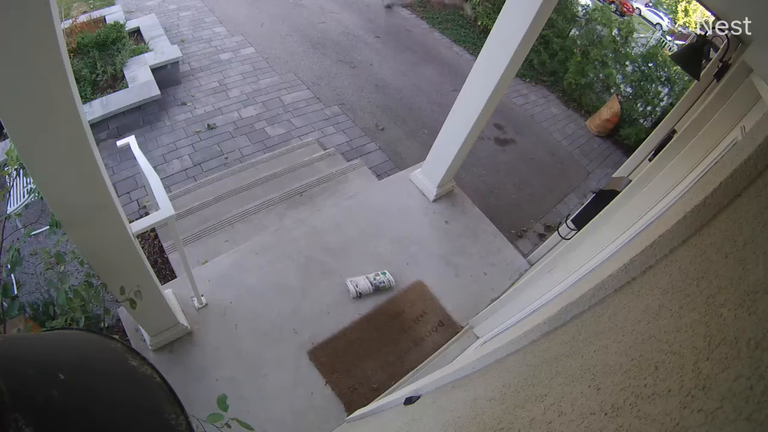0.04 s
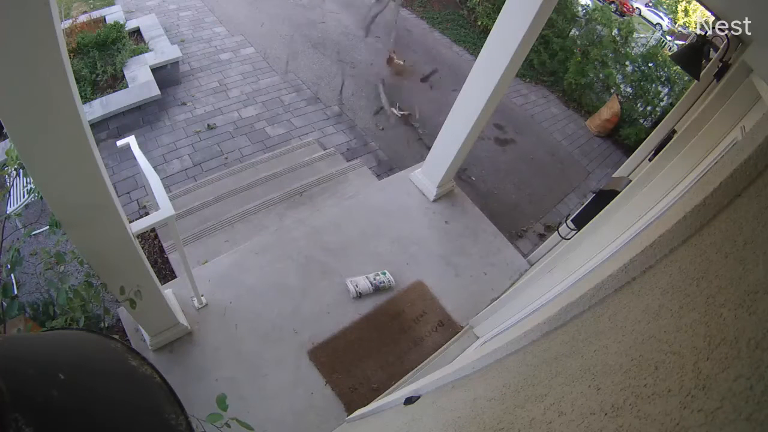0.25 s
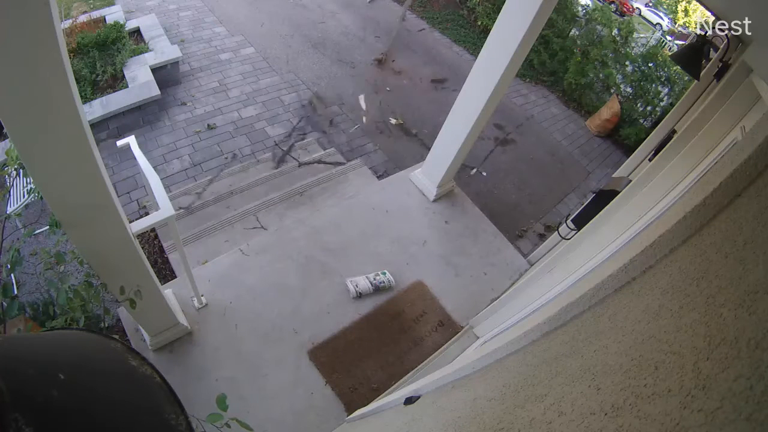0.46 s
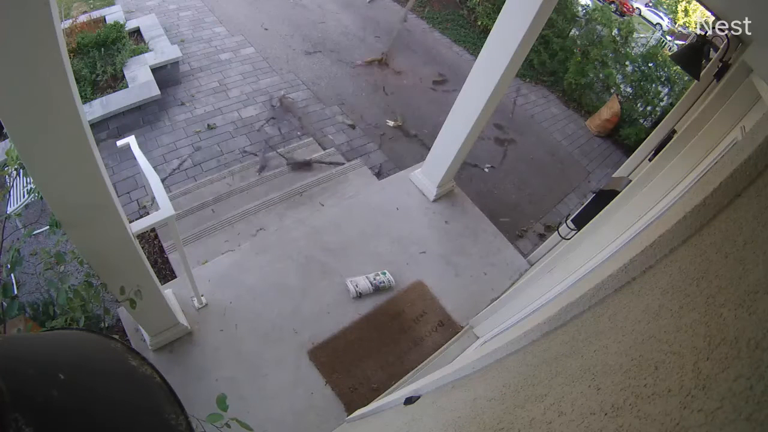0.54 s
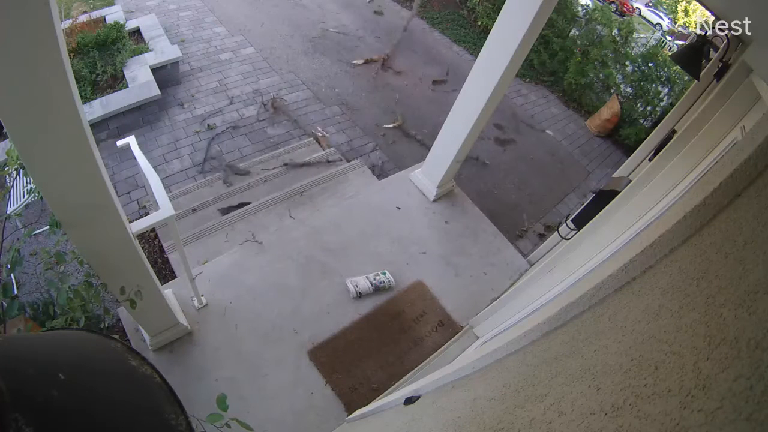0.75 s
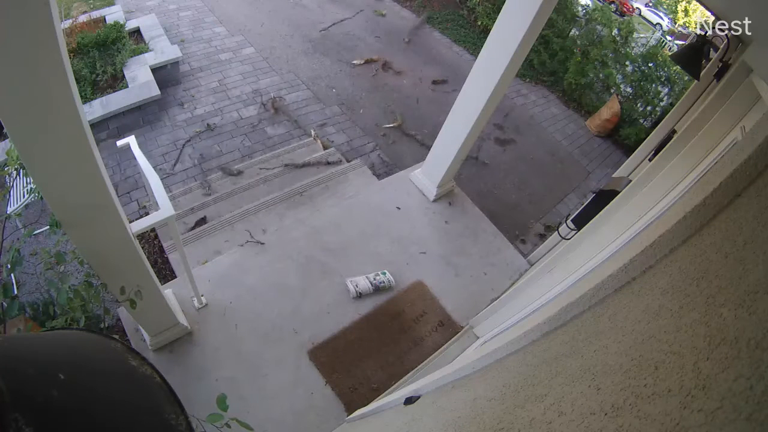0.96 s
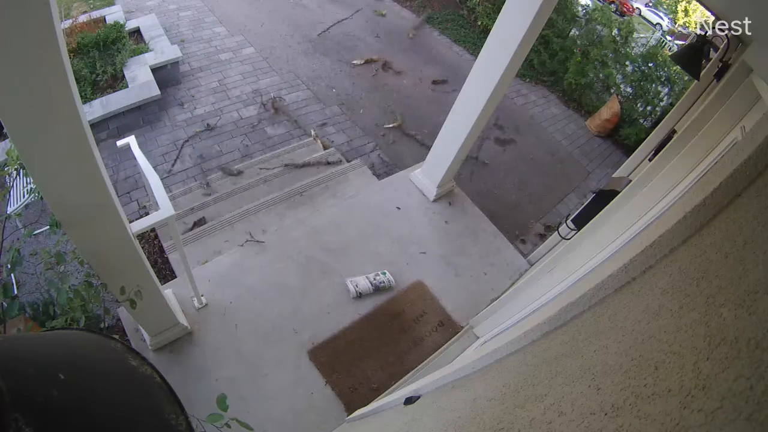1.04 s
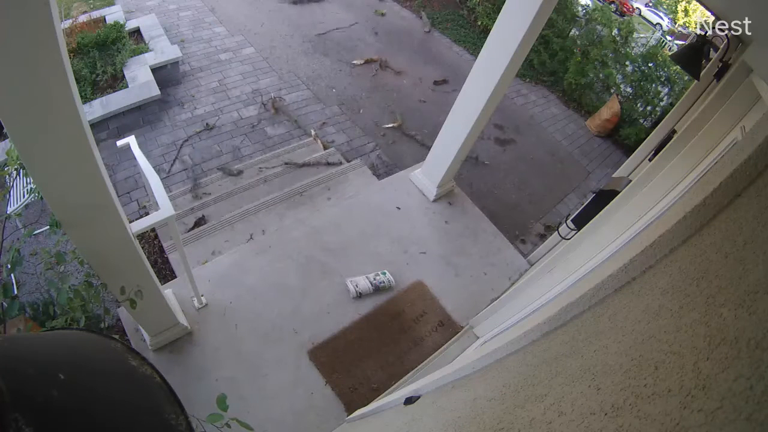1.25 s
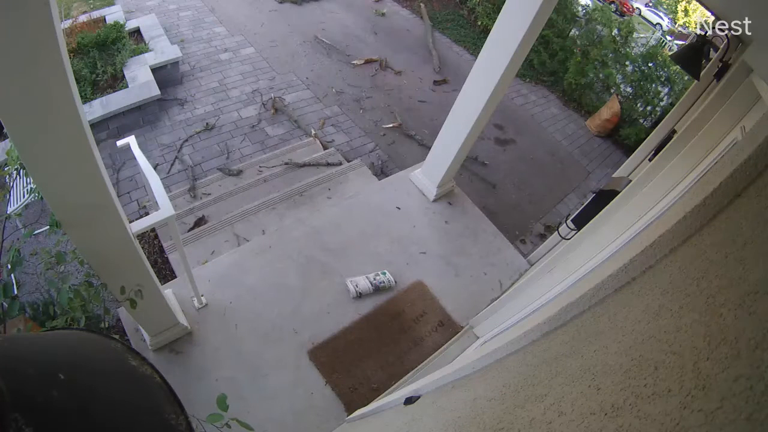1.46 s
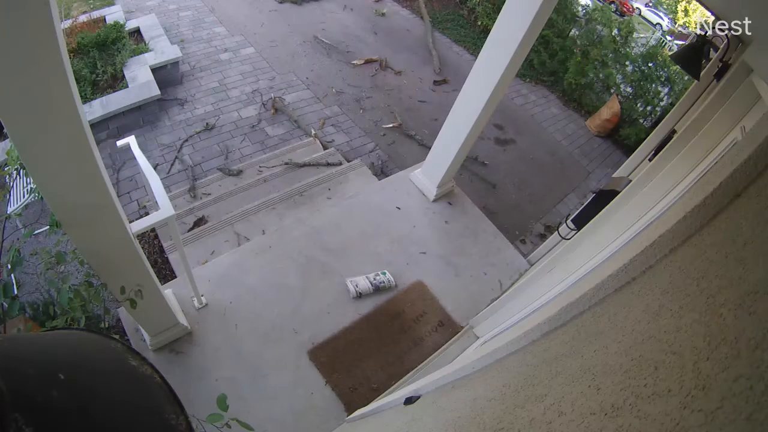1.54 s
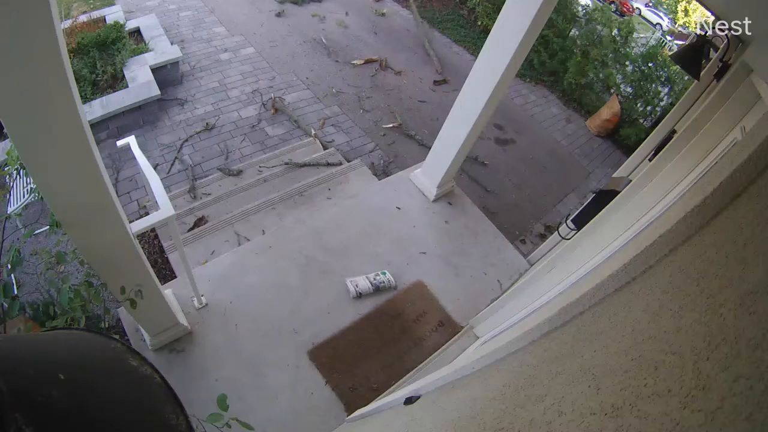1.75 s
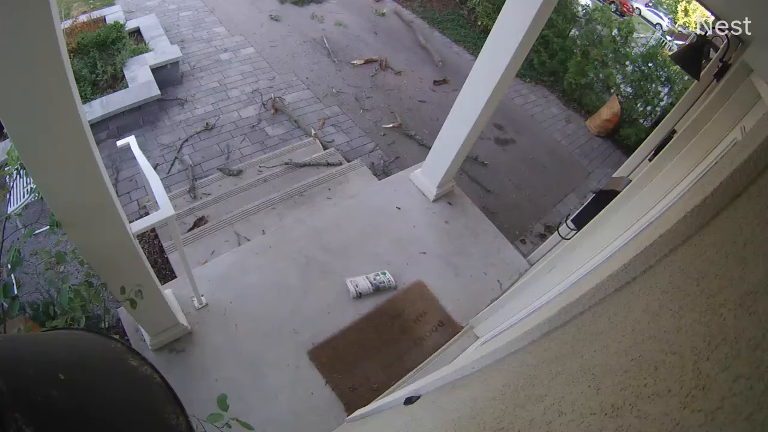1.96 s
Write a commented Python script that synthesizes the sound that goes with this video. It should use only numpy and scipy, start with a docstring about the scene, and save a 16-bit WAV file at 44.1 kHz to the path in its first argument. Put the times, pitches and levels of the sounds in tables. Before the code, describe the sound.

A dry tree branch crashes onto a paved driveway. Faint leaf rustle until 0.2 s, then snaps and a loud burst at 0.24, with hollow knocks, ground thumps and a very sharp crack at 0.41. Twigs and sticks clatter, with a ringing woody knock near 0.7 and another hard crack at 0.92. Lighter bounces at 1.2 to 1.7 thin into faint rustle; short porch echo, small dull microphone.

```python
"""Wood snaps and sharp twig hits as a dry branch crashes onto a paved driveway: resonated noise and clicks.
Heavy limbs land with resonated contacts and ground thumps, while damped sines ring on.
Showers of twigs and sticks are random contacts convolved with ringing modes; struck wood pings as sines.
Leaves rustle as fluttering filtered noise. A porch adds a short echo of sparse decaying reflections,
and a small microphone narrows the band."""
import sys
import numpy as np
from scipy import signal
from scipy.io import wavfile
from scipy.ndimage import uniform_filter1d

SR = 44100
rng = np.random.default_rng(int(sys.argv[2]) if len(sys.argv) > 2 else 0)


def dump(signal):
    """Clip the signal to [-1, 1] and save it as 16-bit WAV at the path in sys.argv[1]."""
    limited = np.clip(np.atleast_2d(signal).T, -1, 1)
    pcm = np.round(limited * 32767).astype(np.int16)
    wavfile.write(sys.argv[1], SR, pcm)


N = 88200  # samples: two seconds

# Spectrum of the foliage rustle, relative: f/Hz, level/dB
LEAF_SPECTRUM = [(30, -16.5), (250, -8.5), (600, -7.5), (1300, -11), (2200, 0), (3500, -1), (4500, 12),
                 (5500, -0.5), (7400, -8.5)]
# Reverberation time of the porch: f/Hz, t60/s
PORCH_DECAY = [(100, 0.5), (600, 0.23), (2500, 0.38), (7000, 0.17)]
# Sprays of small wood: peak t/s, rise/s, decay constant/s, twig level/dB, stick level/dB, emphasised twig f/Hz
SPRAYS = [(.01, 0.08, 0.079, -39, -50.5, 3830), (0.238, 0.013, 0.0059, -17.5, -24.5, 3070),
          (.284, 0.069, 0.039, -26, -32.5, 4460), (0.316, 0.019, 0.0039, -22.5, -28.5, 4500),
          (.385, 0.0061, 0.033, -30, -39, 3550), (0.415, 0.0053, 0.2, -42.5, -37.5, 4370),
          (0.483, 0.013, 0.045, -30.5, -36, 3560), (.512, 0.045, 0.16, -28.5, -33.5, 3670),
          (0.574, 0.011, 0.024, -30, -35.5, 2990), (.665, 0.1, 0.055, -29, -41.5, 2800),
          (0.704, 0.041, 0.032, -25, -28, 4750), (0.801, 0.059, 0.26, -39, -42, 4470),
          (.923, 0.0042, 0.006, -36.5, -22.5, 2700), (0.954, .0095, 0.072, -40.5, -50.5, 2600),
          (1.059, 0.031, 0.14, -38.5, -47, 4300), (1.164, 0.053, 0.15, -32.5, -47, 3790),
          (1.226, 0.036, 0.059, -27, -36, 3000), (1.313, .005, 0.011, -28, -55, 4930),
          (1.377, 0.056, 0.05, -35.5, -40.5, 4360), (1.46, 0.0048, 0.051, -34, -35.5, 3950),
          (1.512, 0.0073, 0.034, -37.5, -51, 4200), (1.578, 0.0042, 0.077, -30.5, -40, 3700),
          (1.66, .004, 0.01, -29, -47, 4350), (1.714, 0.053, 0.016, -29.5, -44, 3520)]
# Spectra impressed on the clatter of twigs and of sticks, relative: f/Hz, level/dB
TWIG_SPECTRUM = [(200, -54.5), (900, -28), (1800, -5.5), (2800, -1), (3700, -3), (4700, 1), (5400, -2.5),
                 (7400, -1.5)]
STICK_SPECTRUM = [(150, -66), (600, -7.5), (950, -1.5), (1400, 6), (2000, 7.5), (2800, -2), (5000, -47)]
# Single ringing notes of struck wood, from sticks and the limb: onset t/s, level/dB, f/Hz
WOOD_PINGS = [(.24, -30, 1369), (.585, -30.5, 2880), (.69, -30.5, 940), (.835, -37.5, 298.4),
              (1.21, -43, 2882), (1.305, -28.5, 4930), (1.466, -35, 1570), (1.697, -39.5, 3306)]
# Modes of the main limb: f/Hz, level/dB, t60/s
LIMB_MODES = [(303, -14, .35), (364, -15, .4), (455, -12, .18), (516, -12, .25), (548, 0, .24),
              (633, -13, .3), (764, -17, .3), (941, -14, .22)]
# Limbs landing: peak t/s, rise/s, decay constant/s, knock level/dB, knock f/Hz, thump level/dB, ringing level/dB
LANDINGS = [(0.241, 0.018, 0.013, -27, 692, -42, -42.5), (0.314, 0.0083, 0.0088, -28, 723, -48.5, -46),
            (0.383, 0.0028, 0.019, -26, 490, -43, -72), (.411, 0.0077, 0.026, -28.5, 730, -47.5, -44),
            (0.529, .06, 0.03, -40, 400, -48.5, -52.5), (.581, 0.032, 0.046, -35, 602, -50.5, -40),
            (.656, 0.018, 0.096, -36, 650, -54.5, -41.5), (.711, .02, .026, -28.5, 440, -47, -26),
            (.775, .015, .02, -42, 370, -57, -35), (.854, 0.035, 0.057, -39.5, 352, -51, -68),
            (0.918, 0.023, 0.0023, -33, 707, -48.5, -73.5), (1.05, 0.11, 0.48, -53, 500, -62, -71.5),
            (1.164, 0.029, 0.0084, -43, 400, -84.5, -49.5), (1.228, .018, 0.07, -33, 640, -56, -38),
            (1.274, .02, 0.019, -34, 432, -48.5, -54), (1.464, 0.0098, 0.017, -38, 520, -56, -58),
            (1.598, 0.038, 0.23, -50, 584, -62, -49), (1.733, 0.0086, 0.0086, -41, 558, -53.5, -78),
            (1.843, 0.016, 0.028, -51.5, 375, -73, -77)]
# Spectrum of the thump in the ground, relative: f/Hz, level/dB
THUMP_SPECTRUM = [(15, -20), (42, -1), (75, -5.5), (110, -2), (190, -1), (400, -9), (1500, -71)]
# Wood snapping, and single sharp twig hits: t/s, level/dB, f/Hz, decay constant of the crackle/s
SNAPS_AND_HITS = [(.1955, -30.5, 4210, 0.0037), (.2372, -26, 2720, 0.002), (.2387, -21, 1333, 0.0034),
                  (.309, -32.5, 4520, 0.0014), (.3148, -36.5, 4000, .0018), (.4113, -13.5, 3370, 0.00091),
                  (.4861, -20.5, 3610, .006), (.5095, -30.5, 3410, .003), (.5765, -28.5, 2920, 0.0023),
                  (.709, -23.5, 3000, 0.0016), (.9022, -20.5, 2300, .0028), (.905, -21.5, 3700, .003),
                  (.9182, -26, 3090, .001), (.9217, -13, 3100, .0012), (1.173, -28, 3200, .002),
                  (1.367, -29.5, 4400, 0.0017), (1.3795, -30.5, 2540, 0.0021), (1.4609, -37, 3300, .004),
                  (1.578, -31, 3780, .003), (1.6863, -28.5, 3670, 0.00097), (1.7185, -41, 3900, 0.0013),
                  (1.891, -48, 4600, .0035)]
# Response of the microphone ahead of its low-pass: f/Hz, gain/dB
MICROPHONE_RESPONSE = [(20, 1.5), (5000, 1.5), (5700, -4.5), (6300, -3.5), (7300, -19)]

LEAF_DB, LEAF_FLUTTER_DB = -51, 2.2  # rms level; rms swing of the level
ECHO_DB, CRACK_ECHO_DB = -10.5, -16  # echo gain for debris and for cracks
CUTOFF_HZ = 7400
MODE_SPREAD_DB = 4.5  # scatter of mode strengths within one spray
TWIGS_PER_S, TWIG_SPREAD_DB, TWIG_T60_S = 650, 4.3, 0.12
STICKS_PER_S, STICK_SPREAD_DB, STICK_T60_S = 700, 3.5, .055
TWIG_TICK, STICK_TICK = .36, .55  # tick's weight in each contact, the rest going to the ringing
TWIG_Q, TWIG_PITCH_DB = 3, -2  # resonance added to the twigs, and its gain
PING_T60_S, PING_RISE_S = 0.2, 0.015
KNOCK_Q, THUMP_LAG_S = 1.12, 0.0032
CRACK_Q, CRACKLE_SHARE = 2.2, 1.6  # share: crackle relative to the click
CRACK_RISE_S, CRACK_LEVEL_S = .0018, .003  # growth constant of the crackle; time over which levels are reckoned
CRACK_BODY_DB, CRACK_BODY_S = -1.5, .006  # shiver after the click and its decay constant


def amp(db):
    """Logarithmic level: decibels to amplitude ratio."""
    return 10 ** (np.asarray(db) / 20)


def unit(x):
    """Normalisation to an rms of 1."""
    return x / np.sqrt(np.mean(x ** 2) + 1e-20)


def read(points, hz):
    """Linear interpolation of a table along a logarithmic frequency axis."""
    f, value = np.transpose(points)
    return np.interp(np.log(hz + 1), np.log(f + 1), value)


def add(mix, s, sound):
    """Superposition: adds a sound into the mix at time s."""
    part = mix[max(round(s * SR), 0):][:len(sound)]
    part += sound[:len(part)]


def colour(x, points, size=4096):
    """Minimum-phase filtering: the log gain fixes the phase through the Hilbert transform."""
    hz = abs(np.fft.fftfreq(size, 1 / SR))
    log_gain = np.log(amp(read(points, hz)))
    response = np.exp(np.conj(signal.hilbert(log_gain)))
    taps = np.fft.ifft(response).real[:size // 2]
    return signal.fftconvolve(x, taps)[:len(x)]


def resonate(x, hz, q):
    """Second-order resonance: a peak whose relative width is 1/q, with q held to at least 0.6."""
    return signal.lfilter(*signal.iirpeak(hz, max(q, .6), fs=SR), x)


def steady(x, size=900):
    """Short-time power normalisation: evens the slow level and keeps the fine grain."""
    power = uniform_filter1d(uniform_filter1d(x ** 2, size), size)
    return x / np.sqrt(abs(power) + 1e-12)


def fade(t, t60):
    """Exponential damping: a fall of 60 dB in t60 seconds."""
    return np.exp(-np.log(1000) * t / t60)


def burst(peak, rise, decay):
    """Transient envelope: a straight rise to the peak, then exponential decay."""
    t = np.arange(N) / SR - peak
    return np.clip(1 + t / rise, 0, 1) * np.exp(-np.maximum(t, 0) / decay)


def contacts(per_s, spread_db):
    """Random impact process: sparse impulses of either sign, a few much larger than the rest."""
    size = amp(spread_db * np.minimum(rng.exponential(1, N), 4))
    return size * rng.choice([-1, 1], N) * (rng.random(N) < per_s / SR)


def clatter(low_hz, high_hz, per_s, t60, spread_db, tick, count):
    """Modal impact: every contact in a spray ticks and excites one shared set of damped modes."""
    t = np.arange(SR // 12) / SR  # the ringing is cut off here
    place = (np.arange(count) + rng.uniform(-1, 1, count)) / count
    hz = low_hz + (high_hz - low_hz) * place
    sizes = amp(MODE_SPREAD_DB * np.minimum(rng.standard_normal(count), 1))
    sizes = sizes * rng.choice([-1, 1], count)
    ring = sizes @ np.sin(2 * np.pi * np.outer(hz, t)) * fade(t, t60)
    ring *= np.sqrt(1 - tick) / np.linalg.norm(ring)
    ring[0] += np.sqrt(tick)
    return signal.oaconvolve(contacts(per_s, spread_db), ring)[:N]


def leaves():
    """Amplitude-modulated noise: a faint rustle of foliage whose level flutters at random."""
    flutter = unit(uniform_filter1d(rng.standard_normal(N), size=400))
    rustle = colour(rng.standard_normal(N), LEAF_SPECTRUM)
    return amp(LEAF_DB) * unit(rustle * amp(LEAF_FLUTTER_DB * flutter))


def porch(x):
    """Reverberation: sparse reflections from walls and ceiling, decaying at a rate set by frequency."""
    taps = rng.choice([-1., 1.], SR // 2) * (rng.random(SR // 2) < 2000 / SR)
    taps[:SR // 250] = 0  # no reflection in the first 4 ms
    hz, t, z = signal.stft(taps, SR, nperseg=256)
    t60 = read(PORCH_DECAY, hz)[:, None]
    tail = signal.istft(z * fade(t, t60), SR)[1]
    return signal.fftconvolve(x, tail / np.linalg.norm(tail))[:N]


def showers():
    """Superposed impacts: bright twigs and duller sticks skitter over the paving in bursts."""
    out = np.zeros(N)
    for s, rise, decay, twig_db, stick_db, hz in SPRAYS:
        twigs = clatter(1773.7, 5800, TWIGS_PER_S, TWIG_T60_S, TWIG_SPREAD_DB, TWIG_TICK, count=52)
        twigs = twigs + amp(TWIG_PITCH_DB) * resonate(twigs, hz, TWIG_Q)
        sticks = clatter(702.4, 2868, STICKS_PER_S, STICK_T60_S, STICK_SPREAD_DB, STICK_TICK, count=26)
        spray = amp(twig_db) * steady(colour(twigs, TWIG_SPECTRUM))
        spray += amp(stick_db) * steady(colour(sticks, STICK_SPECTRUM))
        out += burst(s, rise, decay) * spray
    return out


def pings():
    """Single-mode vibration: each ringing note of struck wood is one damped sine."""
    out, t = np.zeros(N), np.arange(SR // 3) / SR
    envelope = np.minimum(t / PING_RISE_S, 1) * fade(t, PING_T60_S)
    for s, db, hz in WOOD_PINGS:
        add(out, s, amp(db) * envelope * np.sin(2 * np.pi * hz * t))
    return out


def limb():
    """Modal vibration: the main limb rings on between landings, each of which tops up its modes."""
    out, t = np.zeros(N), np.arange(N) / SR
    for hz, mode_db, t60 in LIMB_MODES:
        swing = np.zeros(N)
        for s, rise, *_, ring_db in LANDINGS:
            # the ringing starts to grow at the peak of the knock
            swing += amp(ring_db) * burst(s + rise, rise, t60 / np.log(1000))
        out += amp(mode_db) * swing * np.sin(2 * np.pi * (hz * t + rng.random()))
    return out


def knocks():
    """Impact excitation: limbs judder on the paving with a hollow knock and a thump in the ground."""
    out = np.zeros(N)
    for s, rise, decay, db, hz, thump_db, _ in LANDINGS:
        judder = resonate(contacts(per_s=1500, spread_db=0.5), hz, KNOCK_Q)
        judder = resonate(judder, hz, KNOCK_Q / 2)
        thump = colour(contacts(per_s=1300, spread_db=5), THUMP_SPECTRUM)
        out += amp(db) * burst(s, rise, decay) * steady(judder, size=500)
        # the thump starts with the knock but peaks a little later
        late = burst(s + THUMP_LAG_S, rise + THUMP_LAG_S, decay)
        out += amp(thump_db) * late * steady(thump, size=1500)
    return out


def cracks():
    """Transient excitation of a resonance, by snap or twig hit: a crackling onset, a click, a brief shiver."""
    out, lead = np.zeros(N), SR // 100
    t = np.arange(-lead, SR // 20) / SR  # the click comes at t = 0
    for s, db, hz, crackle_s in SNAPS_AND_HITS:
        crackle, shiver = rng.standard_normal((2, len(t)))
        envelope = np.exp(np.minimum(t / CRACK_RISE_S, -t / crackle_s))
        crackle = steady(resonate(crackle, hz, CRACK_Q / 2), size=40) * envelope
        shiver = shiver * (t > 0) * np.exp(-abs(t) / CRACK_BODY_S)
        drive = CRACKLE_SHARE * crackle / np.linalg.norm(crackle)
        drive += amp(CRACK_BODY_DB) * shiver / np.linalg.norm(shiver)
        drive[lead] += 1  # the click
        crack = resonate(resonate(drive, hz, CRACK_Q), hz, CRACK_Q / 3)
        crack *= np.sqrt(SR * CRACK_LEVEL_S) / np.linalg.norm(crack)
        add(out, s - lead / SR, amp(db) * crack)
    return out


def scene():
    """Superposition of direct sound and echo: all the wood and leaves, with the porch's reflections."""
    debris = showers() + pings() + limb() + knocks()
    sharp = cracks()
    echo = porch(amp(ECHO_DB) * debris + amp(CRACK_ECHO_DB) * sharp)
    return (leaves() + echo + debris + sharp)[None]


def record(dry):
    """Band limitation: a small microphone with dull treble, then a steep low-pass."""
    low_pass = signal.firwin(401, CUTOFF_HZ, window=("kaiser", 8), fs=SR)
    return signal.fftconvolve(colour(dry[0], MICROPHONE_RESPONSE), low_pass, "same")[None]


dry = scene()
out = record(dry)
dump(out)
```